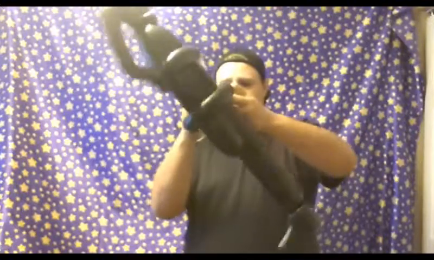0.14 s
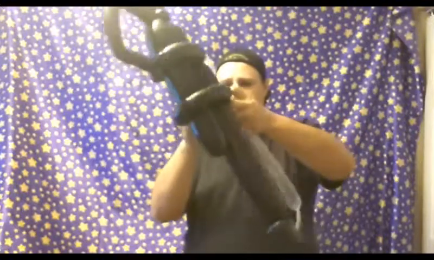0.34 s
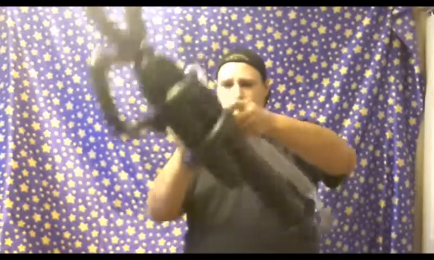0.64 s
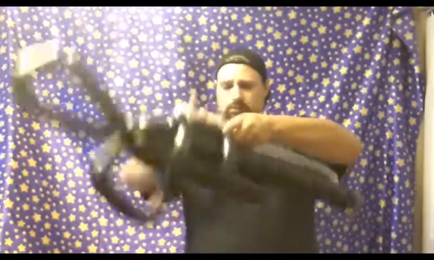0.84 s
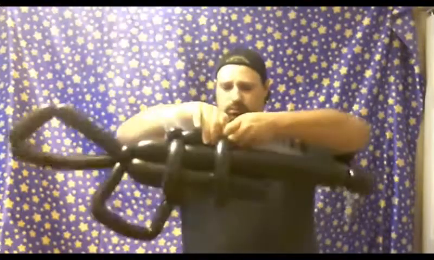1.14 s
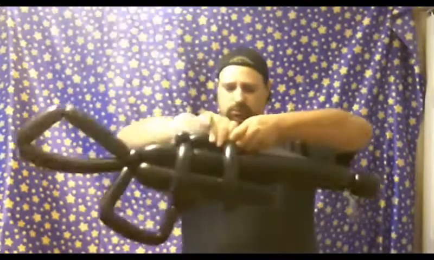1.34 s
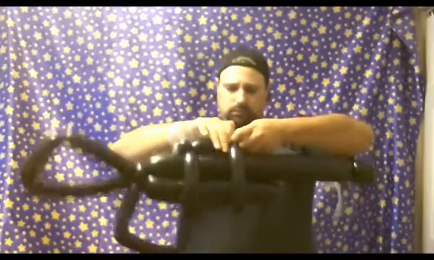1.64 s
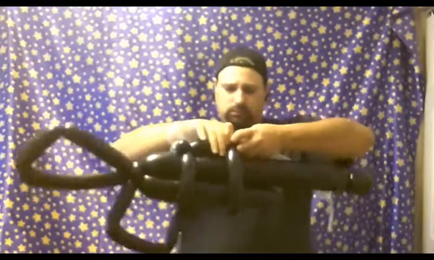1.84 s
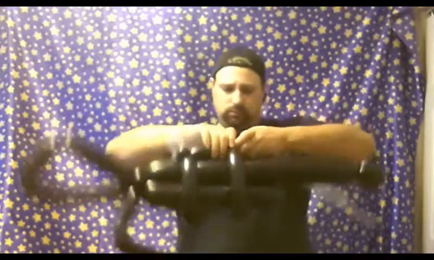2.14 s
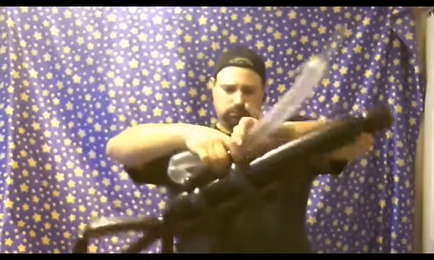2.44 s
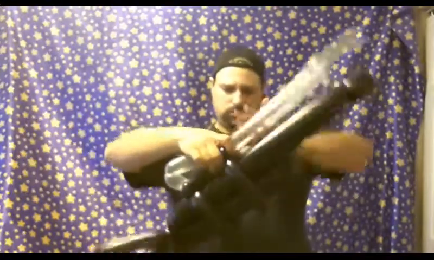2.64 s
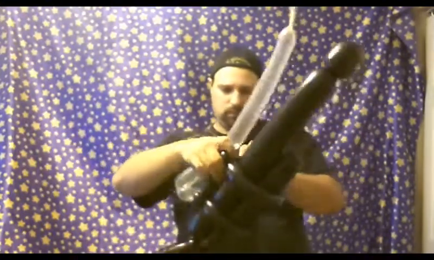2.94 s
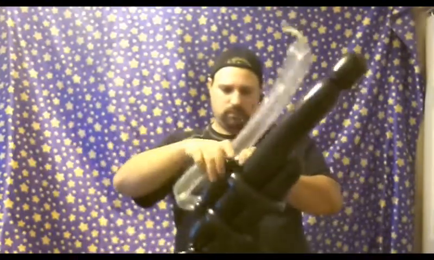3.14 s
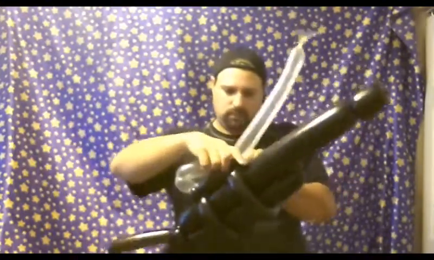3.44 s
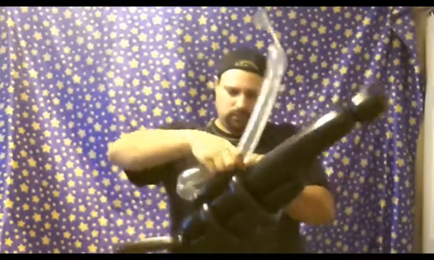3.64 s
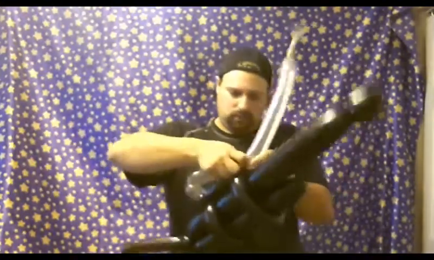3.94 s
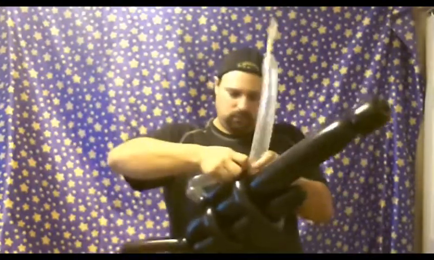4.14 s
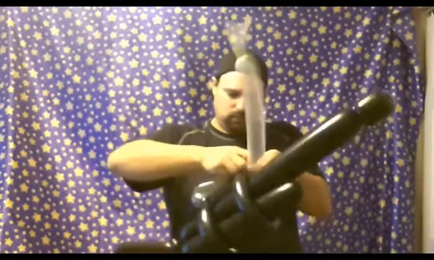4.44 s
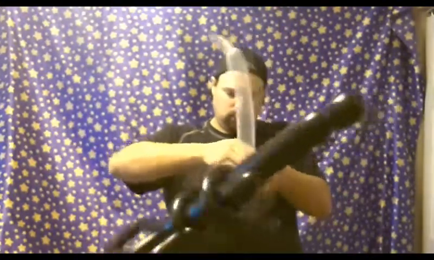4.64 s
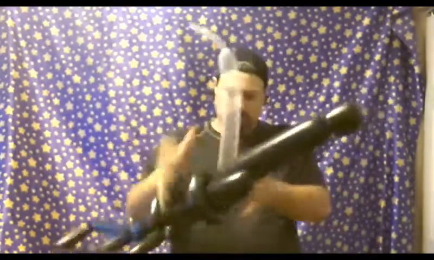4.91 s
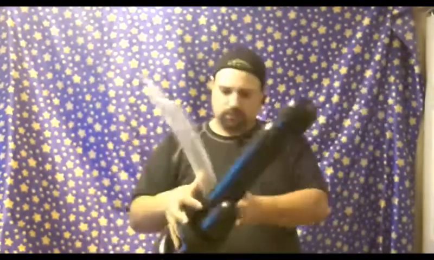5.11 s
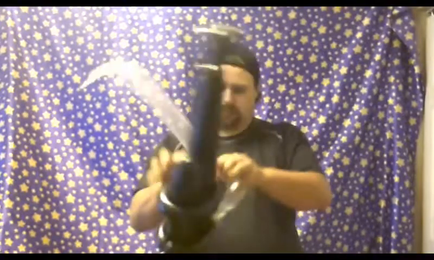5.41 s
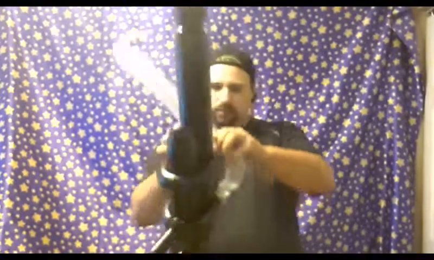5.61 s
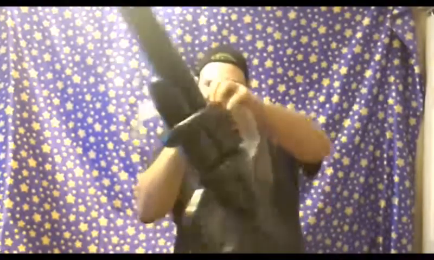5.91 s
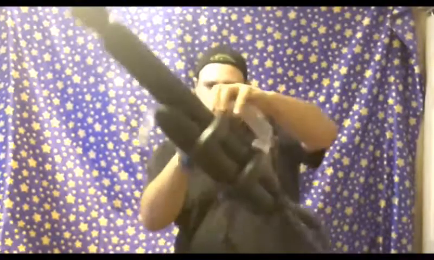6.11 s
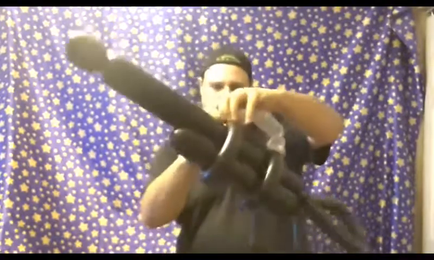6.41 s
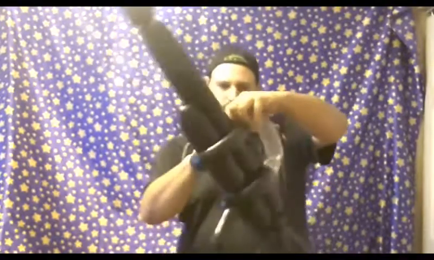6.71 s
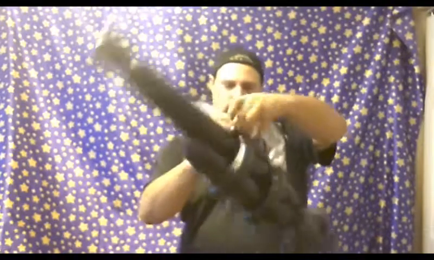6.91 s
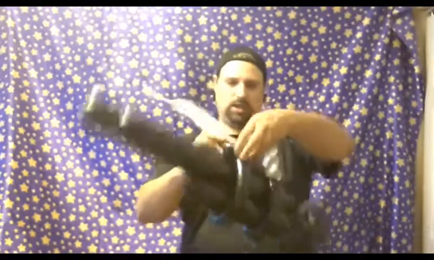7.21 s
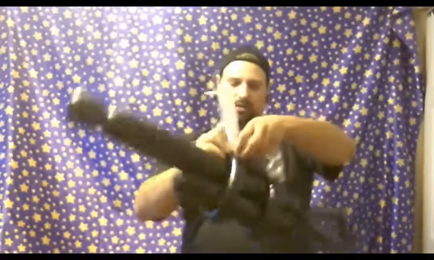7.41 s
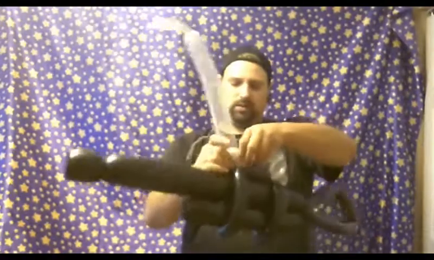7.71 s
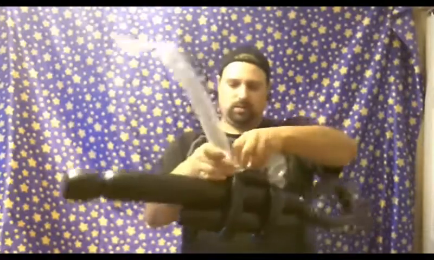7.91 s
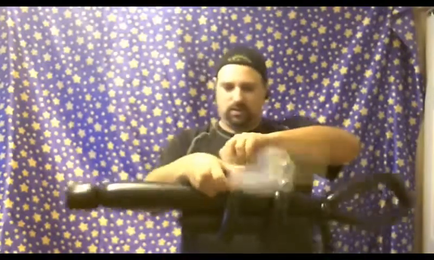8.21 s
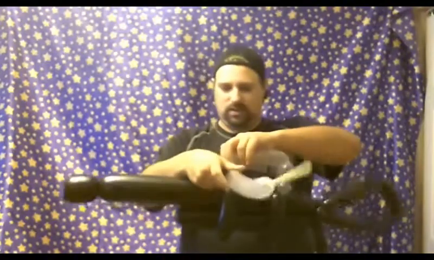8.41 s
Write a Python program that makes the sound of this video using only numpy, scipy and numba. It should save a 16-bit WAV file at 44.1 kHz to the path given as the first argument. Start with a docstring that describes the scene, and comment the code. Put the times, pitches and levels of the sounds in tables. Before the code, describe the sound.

Hands twist and wrap long modelling balloons about a metre from a small stereo camera. Quick scratchy rubs with rubbery creaks follow one another several times a second, broken by sharp cracks as the skins slip. Hollow drumming and low bumps come underneath. The rubbing nearly stops just before five seconds, then resumes busily with harder snaps. Short room echo, faint steady hiss.

```python
"""Long latex balloons are twisted and wrapped round each other about a metre from a small stereo camera.
The skins stick and slip thousands of times a second: each slip scratches, creaks in the stretched rubber
and drums the air in the tubes. Sudden lurches, when a whole patch lets go, crack over the rubbing; the tubes
bump together and swing with a wavering rumble. Filtered, shaped noise-like slips make all of it;
decaying noise makes the answer of a small curtained room, over a faint steady hiss."""
import sys
import numpy as np
from scipy import signal
from scipy.fft import rfft, irfft, next_fast_len
from scipy.io import wavfile
from scipy.ndimage import map_coordinates
from numba import njit

SR = 44100
rng = np.random.default_rng(int(sys.argv[2]) if len(sys.argv) > 2 else 0)


def log_audio(samples):
    """Write samples as a 16-bit WAV file to the path given in sys.argv[1]."""
    # one column per channel
    frames = np.atleast_2d(samples).T
    # limit to full scale, then quantise
    limited = np.clip(frames, -1, 1)
    pcm = np.round(limited * 32767).astype(np.int16)
    wavfile.write(sys.argv[1], SR, pcm)


N = 377363
T = np.arange(N) / SR  # time [s]
STEP = 16  # coarse grid for slow curves and smooth spectra
SIZE = 32 * next_fast_len((N + SR // 2) // 32 + 1)  # transform length, with room for the echoes
F = np.maximum(np.arange(SIZE // 2 + 1) * SR / SIZE, 1)  # frequency [Hz]


def undb(db):
    """Decibels to amplitude."""
    return 10 ** (np.asarray(db) / 20)


def unit(x):
    """Scale to an RMS of 1."""
    return x / np.sqrt(np.mean(x ** 2))


def even_power(response):
    """Scale a filter so that white noise keeps its level through it."""
    return response / np.sqrt(np.mean(np.abs(response) ** 2))


def on_log(table):
    """Read a (frequency, value) table at every frequency, along a logarithmic axis."""
    hz, value = np.transpose(table)
    return np.interp(np.log(F), np.log(hz), value)


def causal(db):
    """Minimum-phase filter with this gain: its energy comes at once and then rings out."""
    cepstrum = irfft(db[::STEP] * np.log(10) / 20)
    half = len(cepstrum) // 2
    cepstrum[1:half] *= 2
    cepstrum[half + 1:] = 0
    ringing = irfft(np.exp(rfft(cepstrum)))
    return rfft(ringing, SIZE)


@njit
def sag(kicks, falls):
    """Jump at each kick that is stronger than what is left, then fall in a straight line."""
    out, level, fall = np.empty(len(kicks)), 0., 0.
    for i in range(len(kicks)):
        level = max(level - fall, 0.)
        if kicks[i] > level:
            level, fall = kicks[i], falls[i]
        out[i] = level
    return out


def bursts(start_s, size, length_s):
    """Envelope of sudden starts that run out within their length."""
    kicks, falls = np.zeros(N), np.zeros(N)
    at = np.clip(np.round(start_s * SR).astype(int), 0, N - 1)
    kicks[at] = size
    falls[at] = size / (np.maximum(length_s, 1 / 1000) * SR)
    return sag(kicks, falls)


LEFT_LAG_S = .00003  # mean delay of the left port behind the right


def slips(count, scatter_db, spread_s):
    """Single slips of uneven size; most sit at the twist, some far along the tubes, and reach the ports apart."""
    when, side = rng.random((count, 2)).T
    size, place = rng.standard_normal((count, 2)).T
    force = undb(scatter_db * np.clip(size, -2, 2)) * np.sign(side - .5)
    # cubing gathers most places near the middle
    port_delay = place ** 3 * spread_s + LEFT_LAG_S
    lag = np.array([1, -1])[:, None] * port_delay / 2
    at = np.clip(np.round(when * N + lag * SR).astype(int), 0, N - 1)
    return unit(np.array([np.bincount(a, force, N) for a in at]))


def judder(count, depth_db, length_s, base):
    """The grip catches and gives at random, tens of times a second, over a constant base."""
    when, size = rng.random((count, 2)).T
    return unit(base + bursts(when * N / SR, undb(-depth_db * size), length_s))


ATTACK_S, RELEASE_DB_PER_S = 0.033, 324  # the attack is centred on the start
# one pull or turn of the hands: (time [s], length [s], scratch level [dB], change over the stroke [dB],
# creak re scratch [dB], drum re scratch [dB], creak centre [Hz], drum centre [Hz])
STROKES = [(0.0, 0.092, -12.5, -4, -10.5, -17.5, 1920, 600),
           (0.106, 0.084, -18, -4.5, -6, -17.0, 1860, 520),
           (0.203, 0.045, -23.0, -1.5, -8.5, -17, 2170, 520.0),
           (0.264, 0.11, -18, -4, -6.5, -17.0, 1900, 720), (0.341, 0.11, -13.5, -3, -4, -23, 2000, 720),
           (0.47, 0.09, -17.5, -10.5, -11, -15, 1880, 556),
           (0.553, 0.081, -14, -4.5, -7.0, -25.0, 2200, 730),
           (0.667, 0.067, -19, 0, -5.5, -14, 1840, 680.0), (0.738, 0.096, -15, -8.5, -5.0, -15, 2060, 630),
           (0.822, 0.17, -19, 0.5, -9.5, -14.0, 1870, 630.0),
           (0.951, 0.16, -13.5, -7.5, -7.5, -9.5, 1670, 580), (1.093, 0.057, -17.5, -2, -4, -8, 1900, 550),
           (1.155, 0.16, -12.5, -5.5, -10.5, -15.5, 1720, 610.0),
           (1.357, 0.29, -24.5, -12, -7.5, -11.5, 1630, 524), (1.55, 0.074, -21.5, 4, -3, -14, 1880, 570.0),
           (1.653, 0.2, -11.5, -17, -9.5, -18.5, 1820, 543),
           (1.854, 0.126, -21, 4.5, -6, -19.5, 1940.0, 567),
           (1.99, 0.072, -11.5, -6.5, -10.5, -24, 2010, 660),
           (2.095, 0.15, -14, -9, -6.5, -10, 1730.0, 500.0), (2.222, 0.055, -16.5, 0, -2.5, -7, 1910, 617),
           (2.317, 0.093, -22.5, -6, -7.5, -6, 1430, 567), (2.433, 0.098, -19, 3, -8.0, -15.5, 1670, 646),
           (2.554, 0.21, -21, -7, -7.5, -13.5, 1570.0, 566),
           (2.752, 0.065, -20, -4, -7.5, -17, 2070.0, 560.0),
           (2.799, 0.091, -17.5, 1.5, -6, -15.5, 1690, 670), (2.93, 0.23, -20.5, -3.5, -6, -11, 1800, 675),
           (3.113, 0.12, -15.5, -11.5, -2.5, -11.5, 1940, 570),
           (3.242, 0.08, -14, -4.5, -2.5, -6.5, 1810.0, 665), (3.388, 0.13, -24, -8, -9, -16.5, 2050, 554),
           (3.468, 0.16, -15, -10, -6, -16, 2020, 573), (3.616, 0.11, -18.5, -1, -8.5, -13, 1680, 590),
           (3.725, 0.089, -18.0, -0.5, -9.5, -17, 1650, 605), (3.81, 0.11, -18.5, -3, -7.5, -13, 1830, 464),
           (3.964, 0.062, -18.0, -1.5, 1.5, -10, 1790, 795),
           (4.06, 0.055, -16, 1, -8.5, -16.5, 1820, 360.0), (4.175, 0.11, -13.5, -6, 0, -9.5, 1900, 734),
           (4.358, 0.054, -13.5, -2, -8.5, -15, 2030, 655),
           (4.441, 0.081, -13.5, -1.5, -7, -17.5, 1920, 517),
           (4.543, 0.078, -15.5, -3.5, -10.5, -14, 1770, 610),
           (4.696, 0.096, -22.5, -5.5, -10.5, -14.5, 1800.0, 600),
           (4.925, 0.049, -34.5, 6.5, -1.5, -7, 1500, 340), (4.995, 0.054, -25, 5, -8.5, -10, 1700, 453),
           (5.064, 0.089, -12, -11, -4, -9.5, 1720, 540), (5.175, 0.037, -14, -2, -8.5, -12.5, 1790, 526),
           (5.257, 0.29, -25.0, -0.5, -10, -12, 1940.0, 537), (5.432, 0.1, -17, -8, -4.5, -9.0, 1610, 650),
           (5.534, 0.06, -14, -10, -10, -14, 1750, 645), (5.633, 0.034, -18, 0.5, -6, -6, 1960, 764),
           (5.677, 0.078, -14.5, -5.0, -8.5, -18, 1800, 664),
           (5.792, 0.18, -16.5, -1.5, -7.5, -14.5, 1960, 690.0),
           (5.917, 0.13, -17, -1.5, -6.5, -28, 2000, 710.0),
           (6.047, 0.11, -13, -15.5, -4, -17, 1980.0, 670),
           (6.194, 0.044, -15.5, -11, -20, -15.5, 2050, 670.0),
           (6.257, 0.098, -15.5, -3.5, -7, -16, 1760, 614), (6.378, 0.059, -14, -3, -7, -23, 2130, 640),
           (6.458, 0.061, -18.5, -5, -9, -14, 2170, 510.0), (6.537, 0.018, -21, -10, -4, -19, 2140, 640),
           (6.578, 0.041, -20, -3, -6, -15, 2000, 620),
           (6.647, 0.075, -16.5, 0.5, -7.5, -16.5, 2000.0, 570.0),
           (6.722, 0.12, -19, 4, -6, -10.0, 1800, 590),
           (6.861, 0.07, -14.5, -3.5, -6.0, -14.5, 1890.0, 600),
           (6.939, 0.12, -24, 3, -7.5, -13.5, 1950, 590), (7.074, 0.047, -27.5, 1.5, -2, -8.5, 1730, 590),
           (7.115, 0.044, -24, 5.5, -14, -19, 1790, 590), (7.147, 0.16, -18.0, -12, -7, -10.5, 1870, 580),
           (7.26, 0.059, -19.5, -10, -7, -13.0, 2070, 510.0),
           (7.332, 0.07, -11, -10.5, -10.5, -21, 1840.0, 473),
           (7.415, 0.068, -18, -6.5, -4, -13, 1860, 546),
           (7.499, 0.19, -24.5, -12, -3.0, -4.5, 1540, 680.0),
           (7.615, 0.035, -20.5, 0, -8, -11.0, 1960, 643), (7.73, 0.073, -13, -12, -10, -18, 2340, 720.0),
           (7.802, 0.073, -17, 1, -6, -15, 1850, 655), (7.907, 0.085, -13, -13.5, -9.5, -17.5, 2120, 420),
           (8.003, 0.12, -18, 0.5, -6, -13.0, 1790, 513), (8.139, 0.17, -14, -10.5, -8.5, -16.5, 1850, 510),
           (8.359, 0.051, -16, -6, -5, -11.5, 1630, 570), (8.417, 0.083, -16.5, 0, 0.5, -10, 1740.0, 540)]


def strokes():
    """Each stroke sets in quickly, swells or sags in dB and dies away; gives levels and pitches."""
    t = T[::STEP]
    columns = np.transpose(STROKES)[:, :, None]
    start, length, level_db, change_db, creak_db, drum_db, creak_hz, drum_hz = columns
    held_db = level_db + change_db * np.clip((t - start) / length, 0, 1)
    released_db = RELEASE_DB_PER_S * np.maximum(t - start - length, 0)
    attack = np.clip((t - start) / ATTACK_S + .5, 0, 1) ** 2
    power = attack * undb(2 * (held_db - released_db)) + 1e-12
    levels = [np.sqrt(np.sum(power * undb(2 * db), axis=0)) for db in (0, creak_db, drum_db)]
    # the louder stroke pulls the pitch its way
    pitches = [np.sum(power * hz, axis=0) / np.sum(power, axis=0) for hz in (creak_hz, drum_hz)]
    return [np.interp(T, t, row) for row in levels + pitches]


def waver(depth_db, per_s):
    """A level that moves in straight dB lines between random points; depth is their standard deviation."""
    points_db = rng.standard_normal(200)
    return undb(depth_db * np.interp(T * per_s, np.arange(200), points_db))


# bass as the tubes swing: (time [s], level [dB])
RUMBLE = [(0.0, -60), (0.76, -60), (0.83, -47), (1.69, -55), (1.81, -50), (2.21, -66), (2.33, -32),
          (2.38, -49), (2.71, -49), (2.76, -46), (2.93, -59), (3.15, -46), (3.65, -57), (3.81, -48),
          (4.36, -54), (4.64, -42), (4.91, -61), (4.96, -35), (5.05, -57), (5.38, -51), (5.43, -40.5),
          (6.08, -91), (6.15, -58), (7.6, -51), (7.67, -37), (7.84, -69), (7.91, -46.5), (8.29, -53),
          (8.46, -87), (8.56, -53)]


def rumble():
    """Swinging tubes push a bass that also comes and goes at random."""
    swing_db = np.interp(T, *np.transpose(RUMBLE))
    return undb(swing_db) * waver(depth_db=8.5, per_s=8)


CREST_DB, THUD_DB = 11.5, -29.5  # peak above the scratch level; low thud re drum
CRACK_DB, CRACK_S = -4, 0.014  # extra at the front re the body, and how long it lasts
STICK_S = 0.023  # how long the skins stick before letting go
# a patch lets go: (time [s], peak level [dB], creak re peak [dB], drum re peak [dB], length [s],
# share of the rub that sticks just before [0-1])
LURCHES = [(0.1236, -3, -24, -44, 0.03, 0.5), (0.179, -7.5, -23, -27, 0.028, 0.5),
           (0.36, -6, -19, -40, 0.024, 0.77), (0.557, -4, -16.5, -35, 0.028, 0.6),
           (0.6678, 1.5, -15, -28.5, 0.016, 1), (0.739, -3, -13.5, -40, 0.025, 0.7),
           (0.817, -5.5, -15.5, -30, 0.037, 0.6), (0.966, -10, -17, -25, 0.033, 0.3),
           (0.979, -9, -24, -21, 0.028, 0.23), (1.03, -9, -26, -24, 0.028, 0.4),
           (1.077, -11, -20, -15.5, 0.051, 0.45), (1.571, -7, -31, -30, 0.028, 0.1),
           (1.672, -9, -21, -32, 0.04, 0.7), (1.8642, -0.5, -13.5, -29.5, 0.014, 0.6),
           (1.892, -8, -21, -27, 0.028, 0.5), (1.9066, 0.5, -29, -43, 0.02, 0.5),
           (1.934, -15, -31, -29, 0.028, 0.95), (2.0986, -6.5, -31, -38, 0.032, 0.65),
           (2.123, -7.5, -14, -23, 0.056, 0.55), (2.236, -17, -21, -26, 0.028, 0.14),
           (2.439, -20, -14, -25, 0.028, 0.6), (2.477, -8.5, -15.5, -34, 0.028, 0.7),
           (2.761, -9.5, -27, -33, 0.028, 0.4), (2.812, -18, -18, -31, 0.028, 0.44),
           (2.9064, -2.5, -14.5, -27, 0.022, 0.9), (2.9342, -5.5, -18, -37, 0.031, 0.8),
           (2.998, -2.5, -16.5, -23.5, 0.02, 0), (3.1174, -6, -9, -21, 0.036, 0.47),
           (3.1254, -4, -9, -19, 0.023, 0.6), (3.25, -16.5, 3.5, -24, 0.08, 0.67),
           (3.377, -3, -23, -46, 0.014, 0.7), (3.405, -12, -27, -33, 0.028, 1),
           (3.47, -6.5, -13, -40, 0.038, 0.3), (3.551, -8, -32, -41, 0.028, 0.26),
           (3.599, -6, -26, -38, 0.028, 0.7), (3.6204, -1.5, -22, -38, 0.03, 0.5),
           (3.674, -9.5, -19, -19, 0.036, 0.6), (3.702, -10, -24, -18, 0.038, 0.7),
           (3.736, -6.5, -17.5, -18.5, 0.042, 0.5), (3.763, -10, -19, -13.5, 0.028, 0.9),
           (3.9544, -3, -10, -25.5, 0.025, 0.9), (4.011, 0.5, -21, -39, 0.033, 0.3),
           (4.1475, -3, -20, -46, 0.035, 0.6), (4.308, -3, -29, -44, 0.015, 0.7),
           (4.3375, -12.5, -3.5, -16, 0.076, 1), (4.427, -14, -17, -30, 0.024, 0.4),
           (4.551, -9, -18, -16, 0.028, 0.7), (4.708, -21, -22, -41, 0.028, 0.9),
           (4.919, -27, -9, -9, 0.028, 0.5), (5.0644, -10, -23, -30, 0.028, 0.7),
           (5.078, -4, -27, -18, 0.032, 0.64), (5.187, -9, -22, -30, 0.028, 0.2),
           (5.4392, -3, -13.5, -23, 0.028, 0.6), (5.546, -5, -15, -24, 0.033, 0.2),
           (5.585, -6, -30, -32, 0.028, 0.5), (5.615, -16, -36, -37, 0.028, 0.8),
           (5.628, -10, -24, -28, 0.028, 1), (5.68, -9, -27, -18.5, 0.021, 0.6),
           (5.7473, -6, -20, -31, 0.032, 0.6), (5.7893, -4.5, -18, -17, 0.031, 0.7),
           (5.9445, -12.5, -6, -23, 0.043, 0.3), (6.2088, -9, -22.5, -35, 0.028, 0.4),
           (6.223, -0.5, -17.5, -34, 0.018, 0.3), (6.262, -12, -27, -31, 0.028, 0.7),
           (6.372, -9, -30, -32, 0.028, 0.5), (6.452, -8.5, -22, -36, 0.034, 1),
           (6.477, -6.5, -21, -37, 0.028, 0.74), (6.547, -6, -26, -29, 0.018, 0.3),
           (6.576, -3.5, -20.5, -35, 0.024, 0.7), (6.6007, 5.5, -23, -32, 0.046, 0.6),
           (6.7283, -1, -13, -22, 0.017, 0.4), (6.8513, -14, -7, -26, 0.06, 0.46),
           (7.271, -4.5, -19, -34, 0.028, 0.3), (7.326, -13, -20, -37, 0.028, 0.6),
           (7.4035, -10, -8.5, -23.5, 0.035, 1), (7.615, -14, -27, -36, 0.035, 0.1),
           (7.6777, 5.5, -9.5, -18, 0.017, 0.95), (7.8013, -2, -18, -34, 0.024, 0.7),
           (7.839, -8, -12, -31, 0.033, 0.7), (7.886, -1.5, -21.5, -29, 0.02, 0.7),
           (8.023, -4, -18.5, -29, 0.026, 0.4), (8.272, -7, -27, -42, 0.02, 0),
           (8.334, -3.5, -21, -31, 0.02, 0.9), (8.376, -5.5, -18, -40, 0.028, 0.4),
           (8.419, -21, -18, -35, 0.028, 0.4)]


def lurches():
    """A patch lets go with a crack in all four ranges; also gives how far the skins stick beforehand."""
    when, peak_db, creak_db, drum_db, length, sticks = np.transpose(LURCHES)
    # time reversed: the skins grip harder and fall quiet in the moments before they let go
    stuck = bursts(T[-1] - when, np.clip(sticks, 0, 1), STICK_S)[::-1]
    # the front of a lurch is a few milliseconds stronger than its body
    crack = 1 + bursts(when, undb(CRACK_DB), CRACK_S)
    drum_level_db = peak_db + drum_db
    levels_db = [peak_db - CREST_DB, peak_db + creak_db, drum_level_db, drum_level_db + THUD_DB]
    return [crack * bursts(when, undb(db), length) for db in levels_db], stuck


# tubes bump together: (time [s], drum level [dB], rumble level [dB], rumble centre [Hz], length [s])
BUMPS = [(0.824, -36, -36, 110, 0.066), (2.32, -13.5, -25, 163, 0.029), (2.735, -33, -33, 115, 0.06),
         (3.15, -18.5, -36, 150, 0.037), (3.958, -22, -39, 146, 0.064), (4.939, -32, -29.5, 80, 0.055),
         (5.079, -21, -45, 151, 0.042), (5.411, -26, -32.5, 143, .05), (7.672, -32, -40, 70.4, .04),
         (7.915, -26, -37, 101, 0.054), (8.217, -39, -39.5, 80.5, .08)]


def bumps():
    """Tubes knock together, striking drum and rumble only; also gives the gliding rumble centre."""
    when, drum_db, rumble_db, hz, length = np.transpose(BUMPS)
    struck = [bursts(when, undb(db), length) for db in (drum_db, rumble_db)]
    return [0, 0] + struck, np.interp(T, when, hz)


SNAP_BAND_HZ = (4600, 7800)
# the two hardest lurches also snap within the scratch range: (time [s], level [dB], length [s])
SNAPS = [(6.602, -10, 0.024), (7.676, -4, .022)]


def snaps(fine):
    """Fine slips in a band, their power falling in a straight line; gives a spectrum."""
    low, high = SNAP_BAND_HZ
    band = causal(-10 * np.log10((1 + (low / F) ** 8) * (1 + (F / high) ** 8)))
    when, level_db, length = np.transpose(SNAPS)
    force = fine * np.sqrt(bursts(when, undb(2 * level_db), length))
    return even_power(band) * rfft(force, SIZE)


EDGES_HZ = (190, 1000, 3300)  # nominal edges between rumble, drum, creak and scratch
OVERLAP = 1.05  # neighbouring ranges reach past their edge by this factor
# colour of a slip at the camera: (frequency [Hz], relative level per Hz [dB])
SLIP = [(25, -31), (58, -18), (110, -19), (170, -23.5), (300, -11), (480, -15), (800, -3.5), (1900, -16.5),
        (3000, -10), (4400, -4.5), (6000, 0.5), (7500, 7), (9100, -7), (13600, -17), (15000, -50.5)]
# resonances of the air and rubber of the tubes: (centre [Hz], width [Hz], lift [dB])
TUBES = [(210.5, 61, 9), (277.8, 45, 12), (397.4, 79, 9.5), (485.5, 38.5, 11.5), (653.4, 4.3, -45),
         (745, 330, -0.5), (1003, 156, 5), (1290, 100, 3.5), (1870, 80, 1), (2190, 210, 1),
         (2540, 300, 2.5)]


def tube_ranges():
    """Air and rubber ring in peaks and dips; gives filters for scratch, creak, drum and rumble."""
    rings = sum(db / (1 + (2 * (F - hz) / width) ** 2) for hz, width, db in TUBES)
    colour = on_log(SLIP) + rings
    above = [-10 * np.log10(1 + (hz / OVERLAP / F) ** 14) for hz in EDGES_HZ]
    below = [-10 * np.log10(1 + (F / hz / OVERLAP) ** 14) for hz in EDGES_HZ]
    ranges = [above[2], above[1] + below[2], above[0] + below[1], below[0]]
    return [even_power(causal(colour + reach)) for reach in ranges]


@njit
def resonate(x, hz, width):
    """State-variable band-pass with a moving centre, gain 1 there."""
    out, band, low = np.empty(len(x)), 0., 0.
    for i in range(len(x)):
        g, k = np.tan(np.pi * hz[i] / SR), width / hz[i]
        v = (band + g * (x[i] - low)) / (1 + g * (g + k))
        band, low, out[i] = 2 * v - band, low + 2 * g * v, k * v
    return out


def balloons():
    """The same fine slips drive four ranges of the tubes, each as strongly as the grip excites it."""
    scratch, creak, drum, creak_hz, drum_hz = strokes()
    rubs = [scratch, creak, drum, rumble()]
    lets_go, stuck = lurches()
    knocks, rumble_hz = bumps()
    # the stretch and size of the part being rubbed set where creak and drum are strongest:
    # (centre [Hz], width [Hz], gain of the peak)
    favoured = [None, (creak_hz, 550., 1.4), (drum_hz, 250., 1.2), (rumble_hz, 60., 1.3)]
    fine = slips(count=60000, scatter_db=4.0, spread_s=.00016)
    grip = judder(count=600, depth_db=26, length_s=0.014, base=0.86) * (1 - stuck)
    out = snaps(fine)
    for rub, lurch, knock, response, peak in zip(rubs, lets_go, knocks, tube_ranges(), favoured):
        steady = rub * grip * judder(count=300, depth_db=3.0, length_s=0.023, base=1.0)
        effort = np.hypot(steady, lurch + knock)
        # sparser slips, drawn anew for each range, roughen the fine ones
        coarse = slips(count=6000, scatter_db=0.5, spread_s=.00012)
        force = effort * (fine + 0.63 * coarse)
        if peak:
            hz, width, gain = peak
            ringing = np.array([resonate(port, hz, width) for port in force])
            force = 0.26 * force + gain * ringing
        out = out + response * rfft(force, SIZE)
    return irfft(out, SIZE)[:, :N]


ROOM_T60_S, ROOM_TREBLE_T60_S = 0.31, 0.16  # time to fall by 60 dB


def tail():
    """Noise echoes that grow duller with time; only their bass is partly alike at both ports."""
    t = T[:SR // 2]
    shared, *own = rng.standard_normal((3, len(t)))
    bass = signal.butter(2, 1300, fs=SR)
    echoes = np.array([n + signal.filtfilt(*bass, 0.51 * (shared - n)) for n in own])
    echoes = echoes * np.minimum(t / 0.011, 1)  # fade-in [s]
    low = signal.lfilter(*signal.butter(1, 2500, fs=SR), echoes)
    treble = echoes - low
    echoes = low * undb(-60 * t / ROOM_T60_S) + treble * undb(-60 * t / ROOM_TREBLE_T60_S)
    return rfft(echoes / np.sqrt(np.sum(echoes ** 2, axis=1, keepdims=True)), SIZE)


ROOM_DB = -5  # echoes re direct sound
MOVES_PER_S = 7


def room(dry, count=3):
    """The balloons keep moving, so the walls answer from one place after another; gives a spectrum."""
    turn = MOVES_PER_S * T
    wet = 0
    for k in range(count):
        distance = np.abs((turn - k + count / 2) % count - count / 2)
        share = np.cos(np.pi / 2 * np.clip(distance, 0, 1))  # equal-power crossfade
        wet = wet + rfft(dry * share, SIZE) * tail()
    return (rfft(dry, SIZE) + undb(ROOM_DB) * wet) / np.hypot(1, undb(ROOM_DB))


# the right port is brighter: (frequency [Hz], left minus right [dB])
PORTS = [(60, 3), (110, -1.5), (200, 1), (380, -1), (690, -0.5), (1270, 0.5), (2350, 2.0), (4330, 1.5),
         (7980, -11.5), (14700, -5.5)]


def ports(spectrum):
    """Each port colours what reaches it; the left takes most of the difference."""
    colours = np.array([causal(on_log(PORTS) * share) for share in (.8, -.2)])
    return irfft(spectrum * colours, SIZE)[:, :N]


def hush():
    """Steady white hiss, separate at each port."""
    return undb(-66) * rng.standard_normal((2, N))


def scene():
    """Balloons in the room, heard at both ports over the hiss."""
    return ports(room(balloons())) + hush()


LIMIT_DB, LIMIT_SLOPE = -9.5, 0.62  # threshold, and the share of the dB above it that is taken off
LIMIT_ATTACK_S, LIMIT_RELEASE_S = 0.028, 0.22
TOP_HZ = 15000


def record(dry):
    """The camera turns down just after loud moments, clips the hardest lurches and cuts the top."""
    keep = np.exp(-1 / (LIMIT_ATTACK_S * SR))
    loud = np.sqrt(signal.lfilter([1 - keep], [1, -keep], np.mean(dry ** 2, axis=0)))
    held = sag(loud, loud / (LIMIT_RELEASE_S * SR))
    over = np.maximum(held / undb(LIMIT_DB), 1)
    clipped = np.clip(dry / over ** LIMIT_SLOPE, -.85, .85)
    top_cut = signal.ellip(8, .2, 70, TOP_HZ, fs=SR, output="sos")
    return signal.sosfilt(top_cut, clipped)


dry = scene()
out = record(dry)
log_audio(out)
```